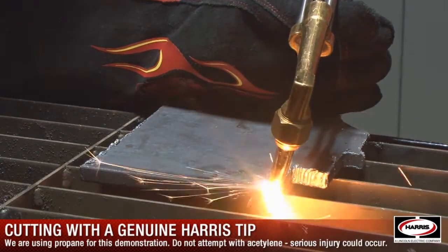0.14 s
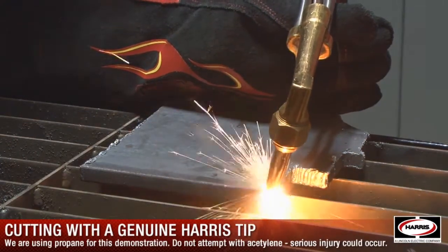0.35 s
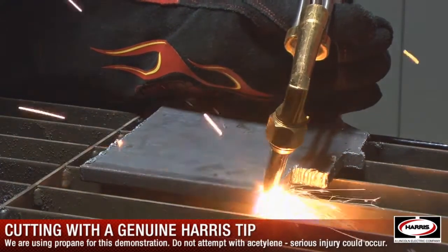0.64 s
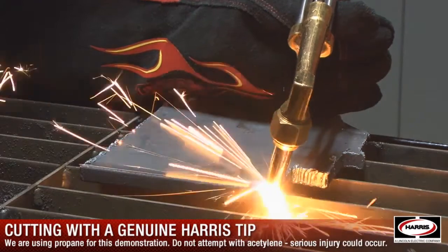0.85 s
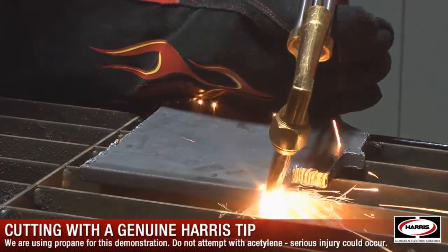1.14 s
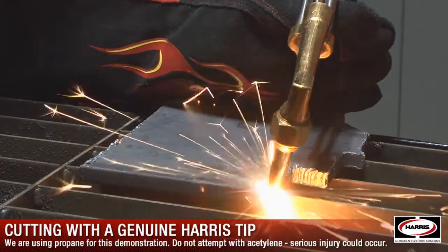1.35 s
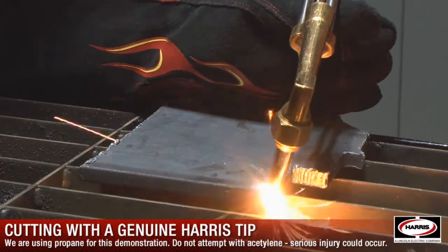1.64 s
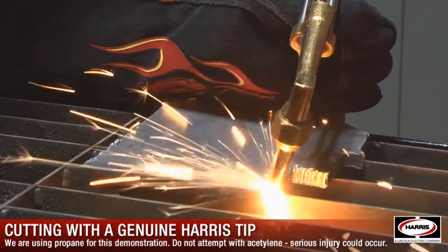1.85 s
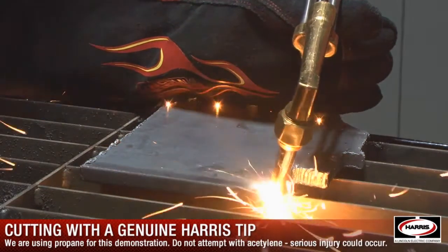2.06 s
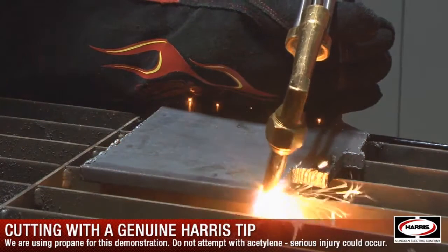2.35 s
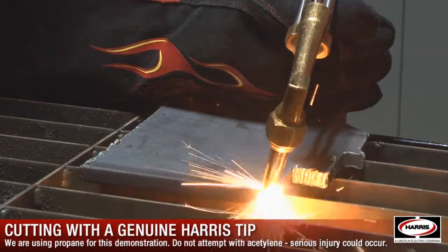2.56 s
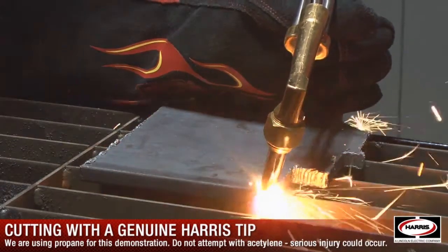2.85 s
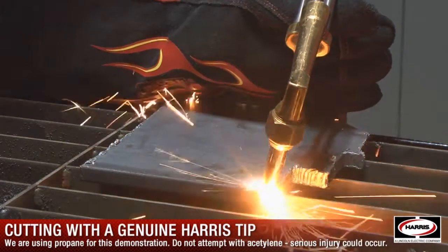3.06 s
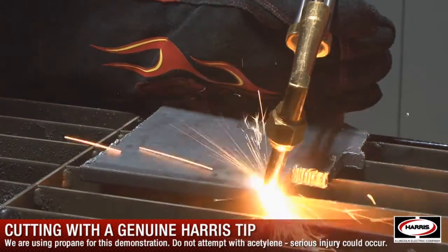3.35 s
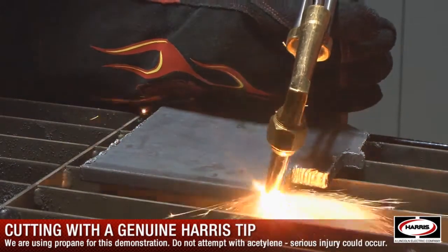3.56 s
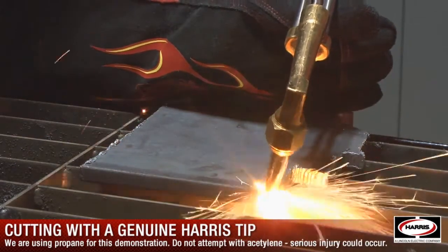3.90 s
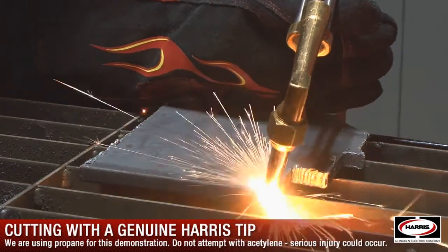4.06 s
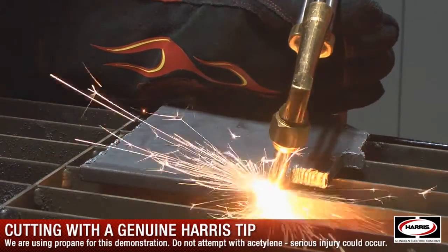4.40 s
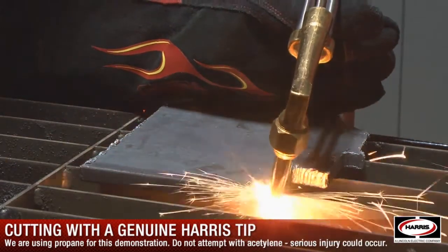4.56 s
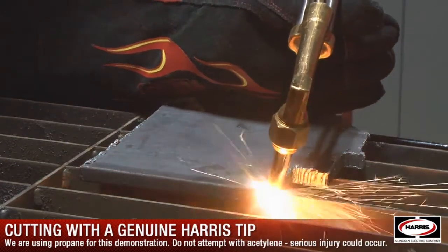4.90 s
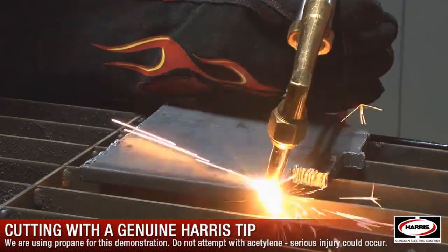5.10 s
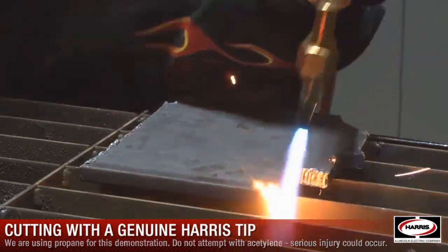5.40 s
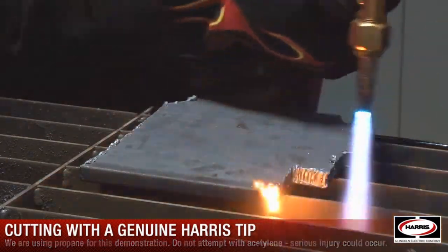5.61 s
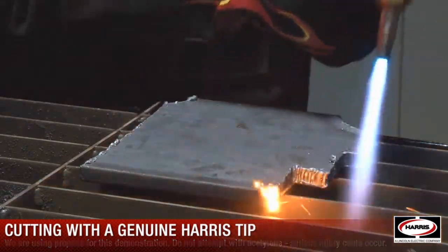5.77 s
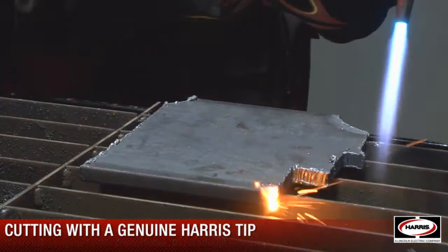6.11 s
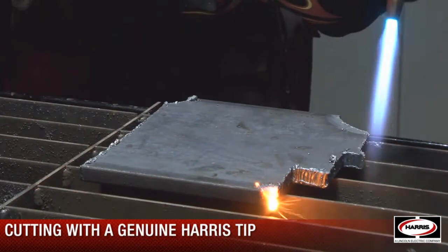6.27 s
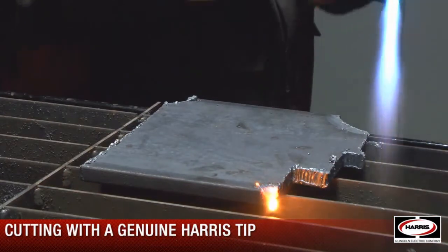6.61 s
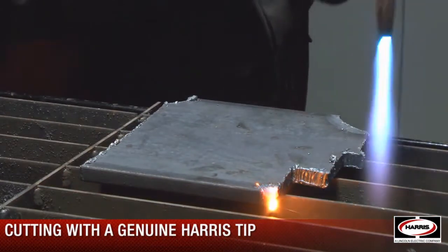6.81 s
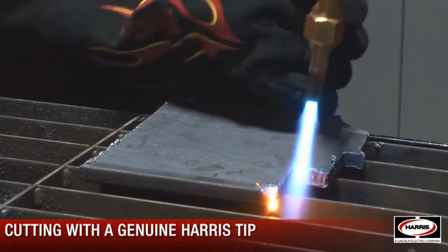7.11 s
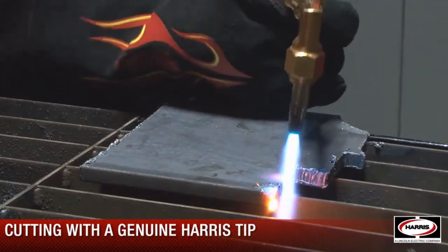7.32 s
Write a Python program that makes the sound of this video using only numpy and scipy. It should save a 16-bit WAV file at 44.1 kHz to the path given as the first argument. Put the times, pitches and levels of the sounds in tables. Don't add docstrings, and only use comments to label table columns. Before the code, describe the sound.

Close, bright gas-jet hiss with ragged sputter, thin squeals and blunt pops, changing after five seconds to an open flame roar and wavering whistle.

```python
import sys
import numpy as np
from scipy import signal
from scipy.fft import rfft, irfft, next_fast_len
from scipy.io import wavfile

SR = 44100
rng = np.random.default_rng(int(sys.argv[2]) if len(sys.argv) > 2 else 0)


def materialize(psi):
    bounded = np.clip(np.atleast_2d(psi).T, -1, 1)
    quanta = np.round(bounded * 32767).astype(np.int16)
    wavfile.write(sys.argv[1], SR, quanta)


def invert_db(level):
    return 10 ** (np.asarray(level, dtype=float) / 20)


N = 328545
T = np.arange(N) / SR
HOP = 16
LIFT_S, LIFT_FADE_S = 5.36, 0.04
LEVER_EDGE_S = 0.012
# t/s, peak level/dB, length/ms
BLASTS = [(0.703, -30.5, 4.8), (0.9256, -32.5, 8.7), (.9503, -37, 3.9), (1.063, -33.5, 5.7),
          (1.4927, -34, 4.8), (2.7184, -31, 4.1), (2.7733, -30.5, 6.4), (2.7824, -34, 5.7),
          (2.8028, -31, 3), (2.9, -32, 3), (2.9217, -36, 2.6), (3.1524, -30.5, 4.9), (3.1636, -31, 7.4),
          (3.1833, -29, 4.5), (3.2577, -27.5, 6.7), (3.2882, -27.5, 7.9), (3.449, -27, 8.8),
          (3.4964, -34.8, 5.6), (3.517, -27.5, 6.2), (3.7598, -26, 5), (3.778, -29, 5.8),
          (3.8004, -30, 4.4), (3.9572, -28.5, 12.5), (4.293, -34, 4.0)]


def rms_one(x):
    return x / np.sqrt(np.mean(np.abs(x) ** 2) + 1e-20)


def in_time(rows):
    s, *columns = np.transpose(rows)
    return np.array([np.interp(T, s, c) for c in columns])


def low_pass(x, cut_hz):
    return signal.sosfilt(signal.butter(2, cut_hz, fs=SR, output="sos"), x)


def drift(rate_hz, count, hop=1):
    r = np.exp(-2 * np.pi * rate_hz * hop / SR)
    run_in = 2000
    noise = rng.standard_normal(count + run_in)
    return rms_one(signal.lfilter([1], [1, -2 * r, r * r], noise)[run_in:])


def swings(rows):
    collapse_share = 0.79
    out = np.zeros(N)
    for s, length_s, height in rows:
        span = slice(max(round((s - 2 * length_s) * SR), 0), round((s + 2 * length_s) * SR))
        along = 2 * (T[span] - s) / length_s
        out[span] += height * np.exp(-(along / np.where(along > 0, collapse_share, 1)) ** 2)
    return out


def whistle(pitch_hz, width_hz, steady):
    count = len(pitch_hz)
    strength = steady + drift(width_hz, count) + 1j * drift(width_hz, count)
    return rms_one(np.real(strength * np.exp(2j * np.pi * np.cumsum(pitch_hz) / SR)))


def kerf():
    # t/s, level/dB
    flow = [
        (0.0, 0),
        (0.6, -3.5),
        (1.2, 0.7),
        (1.8, -2.5),
        (2.4, 1.1),
        (3.0, 1.35),
        (3.6, -0.8),
        (4.2, 0.66),
        (4.8, 5.0),
        (5.4, 0.6),
    ]
    # peak t/s, length/s, size/dB
    pinches = [(0.215, 0.2, 6), (0.663, 0.081, 6), (0.903, 0.035, 6), (1.023, 0.07, 7), (1.432, 0.15, 8),
               (1.871, 0.21, 7.5), (2.03, 0.11, 7), (2.11, 0.11, 6), (2.34, 0.035, 5), (2.809, 0.2, 11),
               (3.108, 0.11, 4.0), (3.258, 0.13, 6.2), (3.447, 0.04, 9), (3.966, 0.07, 6.5),
               (4.106, 0.1, 6), (4.954, 0.11, 4), (5.273, 0.14, 4.5)]
    # peak t/s, length/s, size/dB
    gapes = [
        (0.075, 0.11, 4),
        (0.843, 0.07, 7),
        (1.312, 0.21, 4.5),
        (1.611, 0.047, 1.5),
        (1.741, 0.22, 3),
        (2.25, 0.15, 2.5),
        (2.639, 0.12, 4),
        (3.028, 0.04, 4),
        (5.183, 0.034, 2.5),
    ]
    # peak t/s, length/s, size/dB
    smothers = [(.045, 0.086, 6.0), (.464, 0.11, 7.1), (.813, 0.15, 3.5), (1.252, .11, 7.5),
                (1.661, .12, 18), (2.23, 0.12, 3.5), (2.579, 0.15, 6.5), (2.819, 0.049, 7),
                (3.038, .064, 5.0), (3.317, .04, 5), (4.385, 0.14, 7.5), (4.754, 0.27, 5),
                (5.37, 0.063, 7.0)]
    # peak t/s, length/s, size/dB
    chokes = [(0.224, 0.07, 2), (0.314, 0.062, 4), (0.953, 0.04, 5), (1.142, 0.07, 2.4), (2.06, 0.28, 3),
              (2.38, 0.03, 5.0), (2.739, 0.049, 4.5), (2.958, 0.2, 4), (3.357, 0.12, 4), (3.497, 0.042, 7),
              (3.846, 0.089, 1.5), (4.106, 0.048, 2.5), (4.345, 0.11, 2), (4.974, 0.16, 3)]
    # peak t/s, length/s, size/dB
    belches = [(.125, 0.1, 3), (.574, 0.13, 6), (.673, 0.093, 4), (.89, .06, 1.5), (1.751, 0.089, 4.5),
               (2.08, 0.057, 4.5), (2.58, .12, 3), (2.78, 0.066, 4), (3.278, 0.057, 3.6), (3.677, .07, 3),
               (3.976, 0.042, 7), (4.26, 0.052, -1.5), (5.2, .08, 1.5)]
    by_flow = [0.97, 0.93, 1.2, 0.53]
    by_pinch = [-0.12, -0.12, 0.13, 0.78]
    by_gape = [0.56, 0.51, 1.05, -0.0093]
    by_smother = [-0.0072, .05, -0.051, -1.14]
    by_choke = [-0.77, -1.04, -1.4, -1.07]
    by_belch = [1.2, 0.97, 0.14, .02]
    level_db = np.outer(by_flow, in_time(flow)[0])
    for share, rows in [(by_pinch, pinches), (by_gape, gapes), (by_smother, smothers),
                        (by_choke, chokes), (by_belch, belches)]:
        level_db = level_db + np.outer(share, swings(rows))
    return level_db


def fan():
    # f/Hz, level/dB
    lines = [
        (693, -59.5),
        (1517, -66),
        (117.5, -75),
    ]
    ride_db = np.clip(kerf()[0], -8, 5)
    hum = sum(invert_db(db) * whistle(np.full(N, hz), width_hz=5.3, steady=2.2) for hz, db in lines)
    return invert_db(0.91 * ride_db) * hum


def shop(x):
    t60_s, wall_s = 0.084, 0.003
    age_s = np.arange(round(0.3 * SR)) / SR
    tail = rng.standard_normal(len(age_s)) * invert_db(-60 * age_s / t60_s) * (age_s > wall_s)
    return signal.fftconvolve(x, tail / np.linalg.norm(tail))[:N]


def blow_backs():
    # t/s, peak level/dB
    spits = [(0.3009, -31.5), (0.3032, -34), (0.5976, -30), (.7087, -34), (.7318, -30.5), (1.557, -32.5),
             (1.7387, -31), (1.7412, -28), (1.8263, -32), (2.884, -31.5), (3.4438, -29), (3.638, -33),
             (3.7174, -33), (5.1752, -29.5)]
    # t/s, peak level/dB
    puffs = [(.048, -45), (0.54, -47), (.611, -51), (.628, -42), (.647, -34), (.676, -39), (.693, -39),
             (1.371, -41), (1.5645, -39), (1.773, -55), (1.841, -54), (2.39, -53), (2.7519, -44),
             (3.47, -38), (3.971, -42), (4.1, -46), (4.18, -50)]
    spit_ms, puff_ms = 0.81, 4.1
    capsule_sag_s = 0.0099
    rises, falls = np.zeros((2, N))
    pulses = [*BLASTS, *[(*row, spit_ms) for row in spits], *[(*row, puff_ms) for row in puffs]]
    for s, peak_db, length_ms in pulses:
        rises[round(s * SR)] += invert_db(peak_db)
        falls[round((s + length_ms / 1000) * SR)] += invert_db(peak_db)
    front = signal.lfilter([13.0], [1, -np.exp(-1 / (0.00081 * SR))], rises ** 2)
    pressure = low_pass(0.64 * np.cumsum(rises) + front, 1500) - low_pass(0.7 * np.cumsum(falls), 990)
    eddy = signal.lfilter([1], [1, -np.exp(-1 / (0.013 * SR))], falls + 0.17 * rises) * drift(420.0, N)

    start_s, end_s, flutter_hz, flutter_db = 1.393, 1.458, 325, -36
    turn = 2 * np.pi * np.cumsum(flutter_hz * (1 + 0.0465 * drift(31.6, N))) / SR
    beating = np.clip(np.minimum(T - start_s, end_s - T) / 0.0037, 0, 1)
    flutter = invert_db(flutter_db + 1.8 * drift(40.0, N)) * beating * (np.cos(turn) + 0.34 * np.cos(2 * turn))
    sag = np.exp(-1 / (capsule_sag_s * SR))
    return signal.lfilter([1, -1], [1, -sag], pressure + low_pass(0.1 * eddy, 1700) + flutter)


def gain_control():
    duck_from_db, duck_slope, duck_most_db = -19.5, 1.8, 9.5
    recovery_s = 0.013
    drop_db = np.zeros(N)
    for s, peak_db, length_ms in BLASTS:
        span = slice(round(s * SR), round((s + 0.15) * SR))
        impulse_db = peak_db + 20 * np.log10(length_ms)
        duck_db = np.clip(duck_slope * (impulse_db - duck_from_db), 0, duck_most_db)
        held = np.exp(-np.clip(T[span] - s - length_ms / 1000, 0, None) / recovery_s)
        drop_db[span] = np.maximum(drop_db[span], duck_db * held)
    return invert_db(-drop_db)


def squeals():
    # start t/s, length/s, start f/Hz, end f/Hz, level/dB
    glides = [(.40, 0.029, 3050, 3010, -42.5), (0.628, .024, 2340, 2130, -40),
              (.797, 0.073, 7200, 9900, -35), (1.074, 0.011, 3300, 3300, -37),
              (1.222, 0.095, 4800, 5580, -33.5), (1.345, 0.036, 1690, 1700, -42),
              (2.317, .043, 1665, 1624, -41), (2.502, .06, 5300, 4340, -37), (2.55, .06, 4429, 5200, -35),
              (2.606, .048, 5359, 7330, -30.5), (2.839, .05, 2230, 2090, -42.5),
              (3.004, .036, 5700, 5670, -34.5), (3.02, 0.022, 6900, 7000, -35.5),
              (3.208, .052, 4860, 4200, -38.5), (3.215, 0.053, 2450, 2100, -41),
              (4.243, .035, 2950, 2900, -37.5), (5.355, .025, 4350, 4170, -37)]
    # start t/s, length/s, level/dB
    shrieks = [
        (0.136, 0.17, -34),
        (0.884, .03, -32),
        (1.788, 0.22, -34),
        (2.075, .066, -28.5),
        (2.676, .026, -34),
        (3.725, 0.035, -39),
        (4.05, .05, -38),
        (4.9, 0.079, -30),
        (5.245, .06, -31.5),
    ]
    glide_blur = 0.055
    rows = [(s, length_s, from_hz, to_hz, glide_blur * from_hz, db)
            for s, length_s, from_hz, to_hz, db in glides]
    rows += [(s, length_s, 13100, 12400, 120 + 4100 * length_s, db) for s, length_s, db in shrieks]
    out = np.zeros(N)
    for start_s, length_s, from_hz, to_hz, width_hz, level_db in rows:
        span = slice(round(start_s * SR), round((start_s + length_s) * SR))
        along = np.linspace(0, 1, span.stop - span.start)
        swell = np.sin(np.pi * along ** 1.5) ** 0.5
        pitch_hz = from_hz + along * (to_hz - from_hz)
        out[span] += invert_db(level_db) * swell * whistle(pitch_hz, width_hz, steady=0)
    return out


def jet(span, levels_db, bands_hz, colour, gust_db, patchy_db, sputter_db, near):
    # f/Hz, width/Hz, lift/dB
    bench = [(335, 280, 2.5), (428, 49, 0), (774, 37, 1), (1130, 130, 1), (1280, 23, 1.5), (1670, 100, 4.5),
             (1850, 60, 0.5), (2230, 51, 3), (2540, 100, -0.5), (2728, 55, 5.5), (3700, 120, -1.5),
             (4250, 67, 6.5), (5000, 130, -0.5), (5470, 420, 3.5), (6740, 690, 3.5)]
    count = span.sum()
    curves_db = levels_db[:, span][:, ::HOP]
    curves_db = curves_db - 10 * np.log10(np.mean(invert_db(2 * curves_db), axis=1, keepdims=True))
    steps, size = curves_db.shape[1], next_fast_len(count)
    hz = np.maximum(np.fft.rfftfreq(size, 1 / SR), 1)
    colour_hz, colour_db = np.transpose(colour)
    shape_db = np.interp(np.log(hz), np.log(colour_hz), colour_db)
    for peak_hz, width_hz, lift_db in bench:
        shape_db = shape_db + near * lift_db / (1 + (2 * (hz - peak_hz) / width_hz) ** 2)
    noise = rfft(rng.standard_normal(size)) * invert_db(shape_db)
    gust, sputter = drift(14.0, steps, hop=HOP), drift(115.0, steps, hop=HOP)
    band = np.maximum(2 * np.log2(hz / 88), 0)
    centres = 2 * np.log2(np.array(bands_hz) / 88)
    out = 0
    for k in range(16):
        share = np.clip(1 - np.abs(band - k), 0, 1)
        place = np.interp(k, centres, np.arange(4))
        low = min(int(place), 2)
        level_db = curves_db[low] + (place - low) * (curves_db[low + 1] - curves_db[low])
        flicker_db = place / 3 * (gust_db * gust + sputter_db * sputter)
        flicker_db = flicker_db + patchy_db * drift(17.4, steps, hop=HOP)
        gain = np.interp(np.arange(count) / HOP, np.arange(steps), invert_db(level_db + flicker_db))
        out = out + gain * irfft(noise * share, size)[:count]
    return rms_one(out)


def lever(release_s):
    # start t/s, end t/s
    presses = [
        (6.224, 6.452),
        (6.497, 6.7),
    ]
    return sum(np.clip(np.minimum((T - start_s) / LEVER_EDGE_S, 1 + (end_s - T) / release_s), 0, 1)
               for start_s, end_s in presses)


def flame():
    # t/s, level/dB, sharpness/dB
    strength = [
        (5.38, -38.5, 8),
        (5.48, -36, 2),
        (6.19, -33, 0),
        (6.46, -37, -0.3),
        (6.61, -33.5, -2.5),
        (6.75, -38, -6),
        (6.8, -33, -3.7),
        (7.36, -33, 0.8),
        (7.45, -37, 7),
    ]
    # peak t/s, length/s, size/dB
    flickers = [
        (5.54, 0.096, 5.5),
        (5.68, .1, 2.5),
        (6.1, 0.074, 0.5),
        (6.19, 0.054, -2),
        (6.8, 0.084, -1),
        (7.08, 0.13, 2.5),
        (7.2, 0.17, -3),
    ]
    by_level = [0.59, 1.3, 0.99, 0.32]
    by_sharpness = [.05, .05, .6, 1.01]
    by_lever = [-3.5, 0.1, 3.5, 9.5]
    level_db, sharp_db = in_time(strength)
    out_db = np.outer(by_level, level_db) + np.outer(by_sharpness, sharp_db + swings(flickers))
    return out_db + np.outer(by_lever, lever(release_s=0.045))


def free_jet(free):
    bands_hz = [450, 1600, 5300, 11000]
    # f/Hz, density/dB per Hz
    colour = [(24, -71), (40, -33), (69, -31), (203, -9), (430, -6.5), (909, -9), (1540, -3), (2350, -6),
              (3090, -2.5), (3510, -4), (4180, -5), (6710, -11.5), (15700, -22.5)]
    # t/s, f/Hz, level/dB
    pitch_track = [(5.375, 3850, -46), (5.405, 3770, -29), (5.42, 3270, -30.5), (5.58, 3170, -35),
                   (5.67, 3425, -34.5), (5.75, 3310, -32), (5.85, 3168, -33.5), (6.04, 3030, -34),
                   (6.1, 3120, -32.5), (6.21, 3070, -34), (6.26, 3124, -38.5), (6.44, 3030, -33.5),
                   (6.48, 3110, -41), (6.52, 3110, -32.5), (6.7, 3030, -35), (7.04, 3085, -35),
                   (7.35, 3093, -31), (7.45, 3250, -31.5)]
    # peak t/s, length/s, shift/Hz
    jogs = [
        (5.783, .035, 260),
        (6.226, .025, 480),
        (7.12, .06, -120),
        (7.28, .025, -190),
        (7.345, .05, -120),
    ]
    pitch_hz, level_db = in_time(pitch_track)[:, free]
    lever_sag = 0.085
    pitch_hz = (pitch_hz + swings(jogs)[free]) * (1 - lever_sag * lever(LEVER_EDGE_S)[free])
    wobble = 1 + 0.01335 * drift(46.0, len(pitch_hz))
    tone = invert_db(level_db - 0.1) * whistle(pitch_hz * wobble, width_hz=100, steady=2.4)
    skirt = invert_db(level_db - 6.5) * whistle(pitch_hz * 1.02, width_hz=320, steady=0)
    half = invert_db(level_db - 14.0) * whistle(pitch_hz / 2, width_hz=60, steady=0.91)
    roar = jet(free, flame(), bands_hz, colour, gust_db=0.5, patchy_db=1.14, sputter_db=0.44, near=0.46)
    return invert_db(-30) * roar + tone + skirt + half


def cut_jet(cutting):
    bands_hz = [500, 2300, 6300, 13000]
    # f/Hz, density/dB per Hz
    colour = [(24, -57), (40, -20), (87, -24.5), (188, -6.5), (625, -10), (674, -8.5), (1060, -11.5),
              (1580, -7.5), (2470, -10.5), (2800, -5), (4280, -4), (12500, -2.5), (15700, -2.5)]
    hiss = jet(cutting, kerf(), bands_hz, colour, gust_db=0.6, patchy_db=1.43, sputter_db=1.14, near=0.82)
    return invert_db(-31) * hiss


def torch():
    lifted = np.clip((T - LIFT_S) / LIFT_FADE_S + 0.5, 0, 1)
    cutting, free = lifted < 1, lifted > 0
    out = np.zeros(N)
    out[cutting] += np.sqrt(1 - lifted[cutting]) * cut_jet(cutting)
    out[free] += np.sqrt(lifted[free]) * free_jet(free)
    return out


def scene():
    shop_db, side_db = -10.5, -22
    direct = torch() + squeals() + fan()
    direct = signal.sosfilt(signal.butter(1, 130, "high", fs=SR, output="sos"), direct)
    air = (direct + invert_db(shop_db) * low_pass(shop(direct), 2900)) * gain_control()
    pops = blow_backs()
    side = shop(air)
    side = invert_db(side_db + 5.0 * drift(12.0, N)) * (side - 0.53 * low_pass(side, 2200))
    side = side + 0.074 * (pops + low_pass(air, 770))
    side = side + (0.024 + 0.011 * (T > LIFT_S)) * air
    return air + pops + side * [[1], [-1]]


def roll_off(x):
    return signal.sosfilt(signal.butter(12, 16900, fs=SR, output="sos"), x)


def record(dry):
    top_hz = 15810
    size = next_fast_len(N)
    passed = np.fft.rfftfreq(size, 1 / SR) < top_hz
    mix = irfft(rfft(dry, size) * passed, size)[:, :N]
    return roll_off(mix)


dry = scene()
out = record(dry)
materialize(out)
```